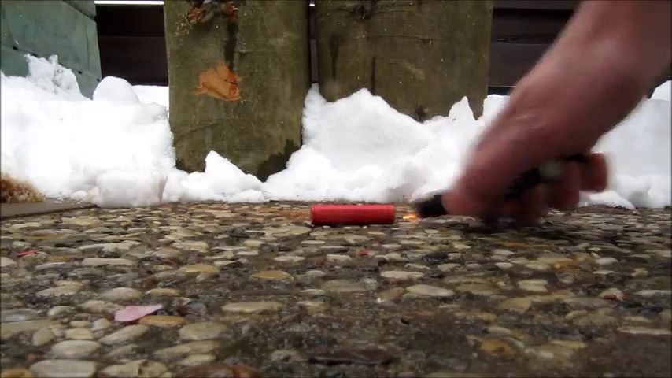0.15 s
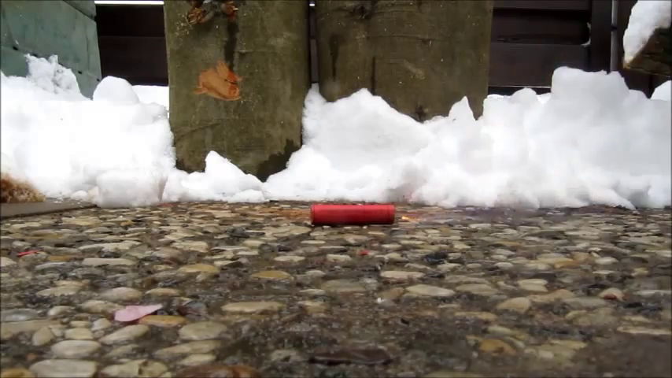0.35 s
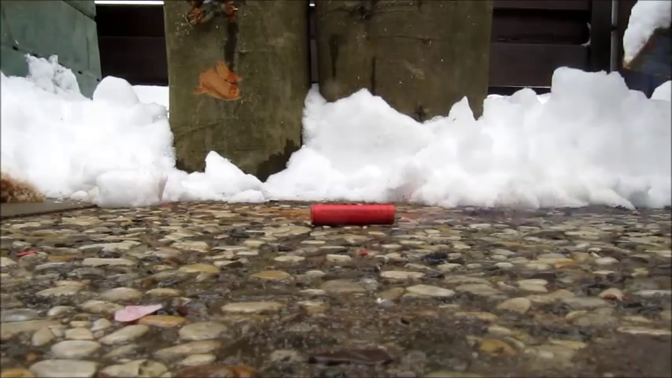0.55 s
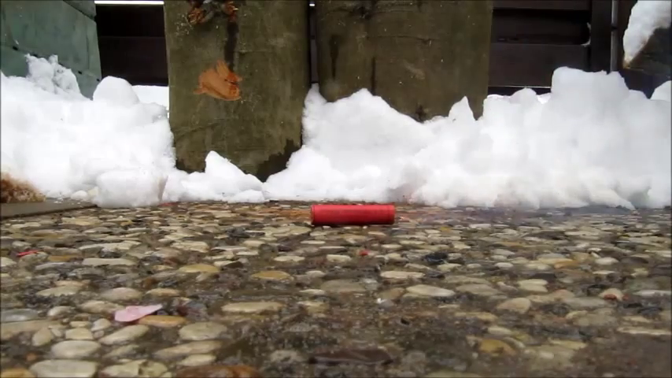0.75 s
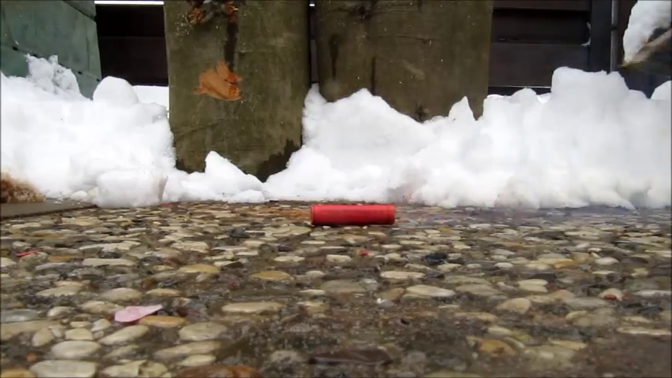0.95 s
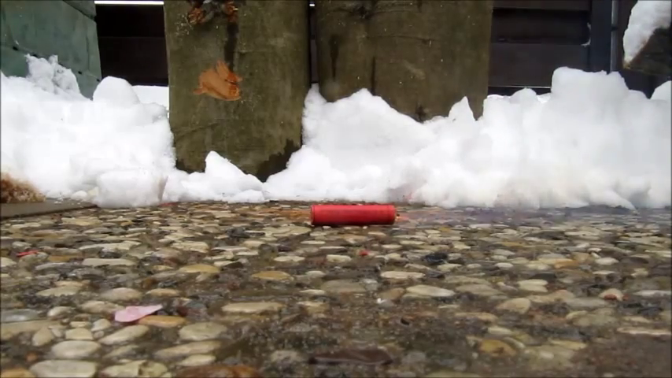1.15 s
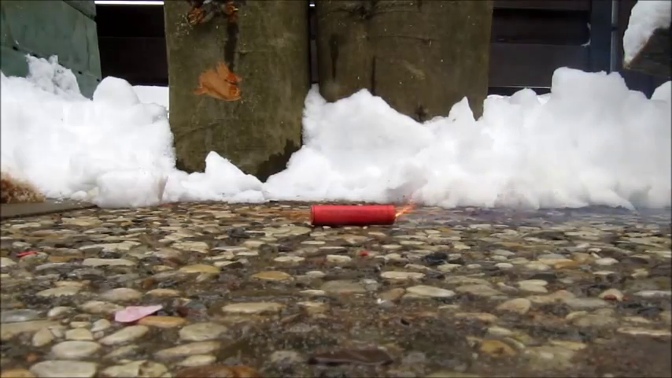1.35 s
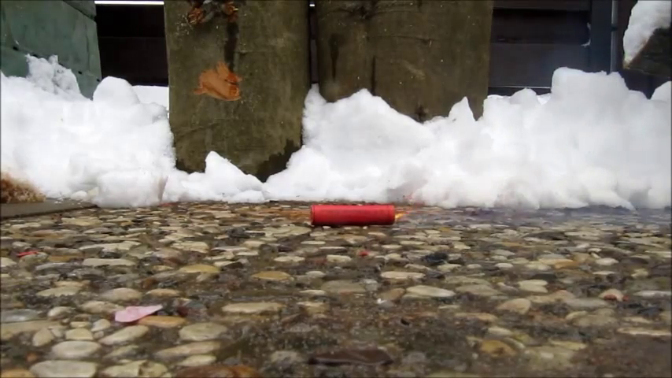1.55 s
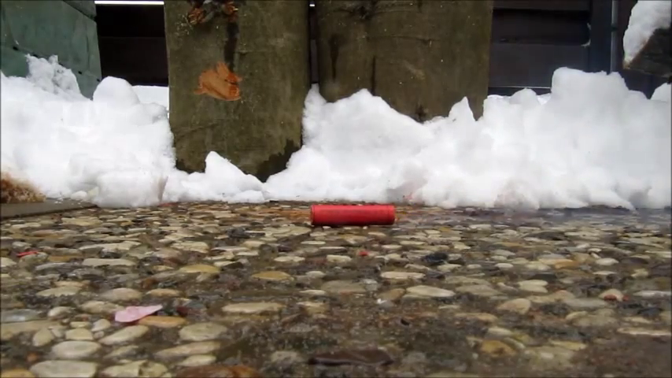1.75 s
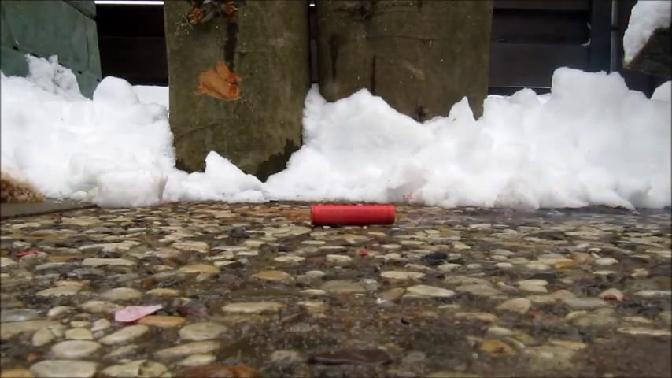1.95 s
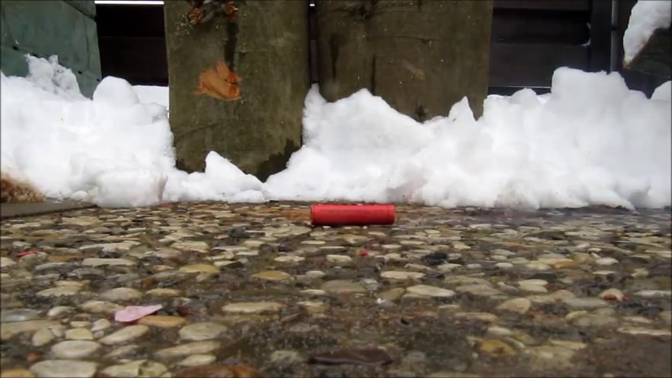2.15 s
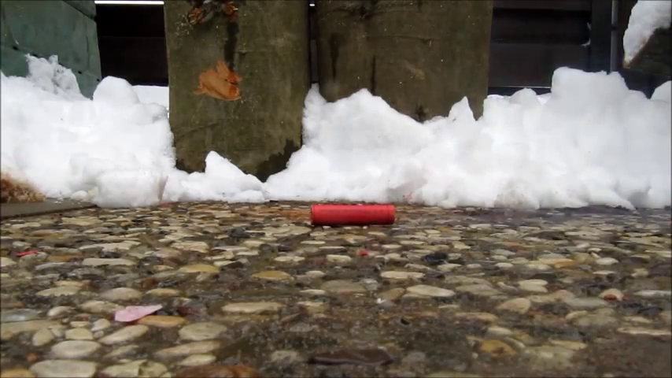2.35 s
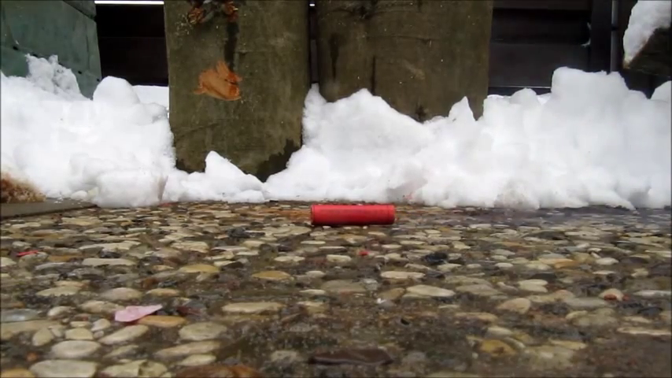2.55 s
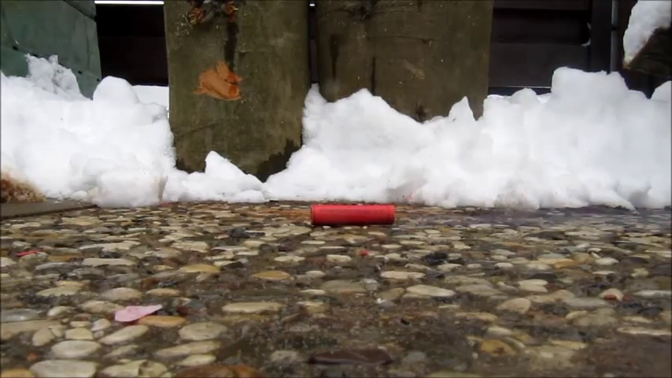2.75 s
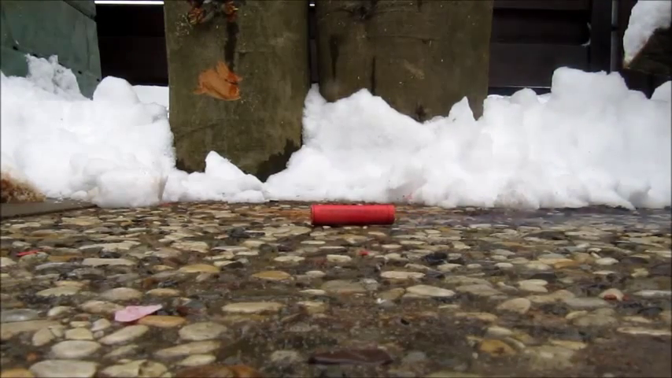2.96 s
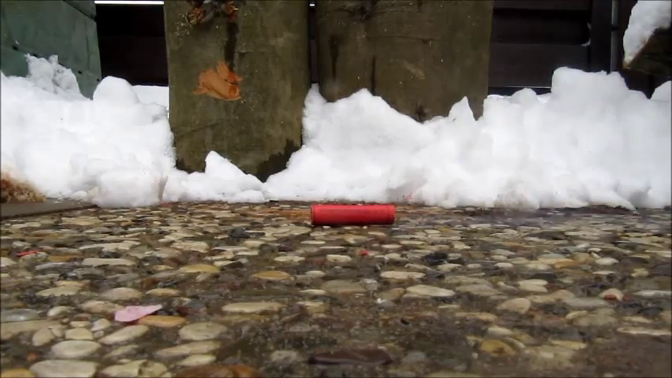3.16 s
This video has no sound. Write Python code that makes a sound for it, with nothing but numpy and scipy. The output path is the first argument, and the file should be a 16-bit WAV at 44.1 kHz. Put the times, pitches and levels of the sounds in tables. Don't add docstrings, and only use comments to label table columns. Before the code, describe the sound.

Burning firecracker fuse on a pebble slab, recorded close outdoors; a gas lighter hisses and snaps off, the fuse fizzes louder and thinner with low wind-like buffeting, then collapses to weak sputtering, with no bang.

```python
import sys
import numpy as np
from scipy import signal
from scipy.io import wavfile
from scipy.ndimage import uniform_filter1d

SR = 44100
rng = np.random.default_rng(int(sys.argv[2]) if len(sys.argv) > 2 else 0)


def unload_wav(signal):
    wavfile.write(
        sys.argv[1],
        SR,
        np.round(np.clip(np.atleast_2d(signal).T, -1, 1) * 32767).astype(np.int16),
    )


def ratio(d):
    e = np.asarray(d, float) / 20
    return 10 ** e


N = 143325

# pitch_hz, width_hz, level_db
SLAB = [
    (716, 98, -7.5),
    (1144, 68, -4.5),
    (547, 176, 2.5),
    (10100, 1300, 2),
]


def evened(x):
    return x / np.sqrt(np.mean(x ** 2) + 1e-20)


def smoothed(x, size, axis=-1):
    return uniform_filter1d(uniform_filter1d(x, size, axis=axis), size, axis=axis)


def swell(t, centre_s, length_s, edge=4):
    return np.exp(-np.abs(2 * (t - centre_s) / length_s) ** edge)


def colour(x, points, bumps=()):
    hz = np.abs(np.fft.fftfreq(8192, 1 / SR))
    point_hz, point_db = np.transpose(points)
    db = np.interp(np.log(hz + 1), np.log(point_hz + 1), point_db)
    for centre_hz, width_hz, bump_db in bumps:
        db = db + bump_db * np.exp(-((hz - centre_hz) / width_hz) ** 2)
    log_gain = np.log(ratio(np.maximum(db, -100)))
    taps = np.fft.ifft(np.exp(np.conj(signal.hilbert(log_gain)))).real[:4096]
    return evened(signal.oaconvolve(x, taps)[:N])


def wander(span_s):
    return evened(smoothed(rng.standard_normal(N), max(int(span_s * SR), 1)))


def steadied(x, span_s=0.044):
    return x / np.sqrt(uniform_filter1d(x ** 2, int(span_s * SR)) + 0.042)


def add(mix, start_s, sound):
    part = mix[round(start_s * SR):][:len(sound)]
    part += sound[:len(part)]


def lighter():
    # pitch_hz, level_db per Hz
    torch = [(150, -62), (250, -21.5), (551, -8), (738, -9), (877, -9), (2680, -5), (9080, -10),
             (10800, -0.5), (15200, -30)]
    # pitch_hz, width_hz, level_db
    nozzle = [(2830, 430, 1.5), (6900, 650, 5), (10500, 900, -1.5), (5600, 550, -7)]
    shut_s, rise_s, close_s = .2152, 0.094, 0.059
    t = np.arange(N) / SR
    rise_db = -8.5 * np.clip(1 - t / rise_s, 0, 1)
    close_db = -60 * np.clip((t - shut_s) / close_s, 0, 2)
    level_db = -39 + rise_db + close_db + 1.0 * wander(0.0078)
    out = colour(rng.standard_normal(N), torch, nozzle + SLAB) * ratio(level_db)
    valve_snap(out, shut_s)
    return out


def valve_snap(mix, shut_s):
    # pitch_hz, level_db, t60_s
    modes = [(1760, -8, 0.0048), (2760, -15, .004), (4330, -10, 0.0049), (5850, -4.5, 0.0059),
             (7200, -10, 0.0054), (8650, -2.5, 0.011), (10000, 0, 0.0055), (11800, -6, .003),
             (12700, -8, .003), (14100, -5, .0025)]
    # delay_s, level_db, struck_hz, breadth_hz
    hits = [
        (-.0002, -11.5, 7500, 8000),
        (.0002, -14, 9800, 2500),
        (.0128, -46, 5000, 6000),
    ]
    u = np.arange(0, .02, 1 / SR)
    attack = np.minimum(u / 0.000214, 1) ** 2
    for delay_s, hit_db, struck_hz, breadth_hz in hits:
        ring = 0
        for k, (hz, db, t60_s) in enumerate(modes):
            excited = np.exp(-((hz - struck_hz) / breadth_hz) ** 2)
            sign = (-1) ** k
            tone = np.sin(2 * np.pi * hz * u + rng.random())
            ring = ring + sign * excited * ratio(db - 60 * u / t60_s) * tone
        add(mix, shut_s + delay_s, ratio(hit_db) * ring * attack)


def buffet():
    # start_s, level_db
    air = [
        (0, -62.5),
        (.55, -66.5),
        (.7, -60.5),
        (1.35, -52.5),
        (1.5, -49.5),
        (2.0, -48.5),
        (2.65, -49),
        (2.85, -58.5),
        (3.25, -63),
    ]
    # centre_s, length_s, level_db
    gusts = [(1.457, 0.032, -48), (1.498, 0.027, -47), (1.58, 0.049, -48.5), (1.774, 0.073, -50.5),
             (1.847, 0.045, -41), (1.916, 0.082, -40.5), (2.03, 0.17, -42.5), (2.113, 0.028, -45),
             (2.238, 0.13, -45.5), (2.336, .05, -45.5), (2.419, 0.044, -42.5), (2.48, 0.028, -45.5),
             (2.559, 0.025, -45), (2.744, 0.09, -45.5), (2.965, 0.066, -54), (3.068, .02, -57)]
    # pitch_hz, level_db per Hz
    lull = [(15, -4.5), (40, 0), (90, -10), (200, -14.5), (400, -31), (800, -94)]
    breeze = [(20, -29), (60, 1), (130, -4.5), (250, -24), (450, -18), (900, -79)]
    rumble = [(20, -4), (45, -9), (90, -1.5), (220, -4), (450, -15.5), (850, -26), (1300, -58),
              (2500, -100)]
    weak_db, strong_db = -55, -36
    t = np.arange(N) / SR
    level = 1e-6 + sum(ratio(db) * swell(t, at, length_s) for at, length_s, db in gusts)
    strength = np.clip((20 * np.log10(level) - weak_db) / (strong_db - weak_db), 0, 1)
    gust_noise, air_noise = rng.standard_normal((2, N))
    gust = (1 - strength) * colour(gust_noise, breeze) + strength * colour(gust_noise, rumble)
    out = steadied(gust) * level * ratio(3.5 * wander(0.006))
    out = out + steadied(colour(air_noise, lull), 0.091) * ratio(np.interp(t, *np.transpose(air)))
    puffs(out)
    return out


def puffs(mix):
    # start_s (of the deepest push), peak_db, pitch_hz
    pushes = [(0.0577, -49, 47.7), (.312, -45.5, 46), (1.472, -43, 60), (1.5538, -32.5, 150),
              (1.5843, -34.5, 60), (1.5984, -26.5, 219), (1.7926, -32, 120), (1.834, -30, 170),
              (1.8509, -34, 250), (1.8616, -22.5, 178), (1.8608, -26.5, 496), (2.311, -34.5, 404),
              (1.7568, -38.5, 160), (1.8959, -22, 130), (1.9097, -23, 294), (1.9173, -31, 160),
              (1.941, -25.5, 199), (1.9593, -30, 141), (1.97, -33, 120), (1.999, -28, 135),
              (2.0093, -27.5, 89), (2.0334, -27, 130), (2.047, -34, 96), (2.067, -28, 127),
              (2.1016, -23.5, 125), (2.115, -31, 190), (2.1785, -37, 110), (2.2054, -33.5, 95),
              (2.2315, -37, 70), (2.2533, -28.5, 89), (2.317, -27.5, 120), (2.359, -35, 133),
              (2.4064, -29, 140), (2.426, -32, 112), (2.4933, -31, 70), (2.5507, -30, 110),
              (2.7138, -36, 86), (2.7339, -30.5, 126), (2.7451, -30, 121), (2.761, -31, 125),
              (3.085, -42, 60), (3.096, -44, 50)]
    decay_turns, snap = .8, .35
    lead_turns = .32
    for at, peak_db, hz in pushes:
        turns = np.arange(0, 3 * decay_turns, hz / SR)
        phase = 2 * np.pi * turns
        push = np.sin(phase) - snap * np.sin(2 * phase) + snap ** 2 * np.sin(3 * phase)
        envelope = np.exp(-turns / decay_turns * 1.55) * np.minimum(turns / 0.14, 1)
        add(mix, at - lead_turns / hz, -ratio(peak_db + 2) * push * envelope)


def patchy(x):
    z = signal.stft(x, nperseg=256)[2]
    field = uniform_filter1d(rng.standard_normal(z.shape), size=4, axis=0)
    field = uniform_filter1d(field, size=16, axis=1)
    patch_db = 0.5 * evened(field)
    return signal.istft(z * ratio(patch_db), nperseg=256)[1][:N]


def spitting():
    spits_per_s, spread_db, spit_share = 5000, 1.5, 0.56
    strength = ratio(spread_db * np.minimum(rng.exponential(1, N), 5))
    spits = strength * (rng.random(N) < spits_per_s / SR)
    gas = rng.standard_normal(N)
    return patchy(np.sqrt(spit_share) * evened(spits - spits.mean()) + np.sqrt(1 - spit_share) * gas)


def burning(t):
    # start_s, level_db, depth (0 bare fuse, 1 inside the tube)
    burn = [(0, -62, 0.2), (.2, -42.5, 0), (.25, -40.5, 0.02), (.48, -32.5, 0.05), (.7, -30, 0),
            (1.0, -28.5, 0.09), (1.25, -26, 0.08), (1.31, -23.5, 0.18), (1.322, -27, 0.36),
            (1.65, -23.5, 0.62), (1.849, -25, 0.76), (2.0, -26.5, 0.68), (2.25, -25, 0.83), (2.5, -26, 0.9),
            (2.9, -27, 0.86), (2.973, -25.5, 0.91), (2.994, -48.5, 0.66), (3.25, -55.5, 0.82)]
    # centre_s, length_s, change_db, depth_change
    pockets = [(0.402, 0.02, 2, 0.06), (0.773, 0.042, 1.5, -0.23), (0.506, 0.025, -3.5, -0.12),
               (0.563, 0.046, 0.5, 0.057), (0.615, .04, 1.5, 0.077), (.72, 0.018, -3.5, -0.091),
               (0.815, 0.067, 3, 0.13), (0.882, 0.057, -1, -0.037), (0.974, 0.013, 4, -0.21),
               (1.038, 0.016, -3.5, 0.1), (1.229, 0.052, 2.5, -0.037), (1.375, 0.051, -1.5, 0.052),
               (1.527, 0.064, -1, -0.024), (1.735, 0.031, -3, -0.096), (1.781, 0.049, 2, 0.086),
               (1.884, 0.035, -3, 0), (1.94, 0.084, -3, -0.031), (2.179, 0.079, 2.5, 0.02),
               (2.292, 0.047, 1, -0.05), (2.51, 0.068, -2, -0.01), (2.676, 0.047, -2, 0.017),
               (2.749, 0.039, -3, -0.023), (2.888, 0.076, -2, -0.019), (2.988, .018, -3, 0),
               (3.075, 0.042, -2.5, 0.18), (3.104, 0.018, 3, 0.1), (3.132, .018, 2.5, 0.05),
               (3.206, 0.022, 1, .1), (3.148, .014, -1, .1), (3.18, .014, -4, .1), (3.232, .016, -2, .2),
               (2.03, 0.22, 0, .1), (0.786, .008, -3.5, 0), (1.725, 0.012, -2.5, -0.069),
               (1.47, 0.13, 0.5, .1)]
    s, db, depth = np.transpose(burn)
    db, depth = np.interp(t, s, db), np.interp(t, s, depth)
    for at, length_s, change_db, deeper in pockets:
        shape = swell(t, at, length_s, edge=9)
        db, depth = db + change_db * shape, depth + deeper * shape
    return db, np.clip(depth, -.25, 1.15)


def swung(x, t):
    # centre_s, length_s, roar_db, top_db
    swings = [(0.32, 0.15, 3.5, -2), (0.58, .13, -4.5, -1.5), (0.7, .08, 2, -1.5), (0.916, .08, 3.5, -5),
              (1.058, 0.084, 7, 1), (1.26, 0.091, -2, 2), (1.374, 0.11, 3, 5), (1.473, 0.086, 2, -1.5),
              (1.692, 0.082, -1, 3), (1.923, 0.048, 0, 7.5), (2.3, 0.04, -0.5, 6), (2.42, .1, -0.5, 3),
              (2.642, 0.084, 2.5, 0), (2.98, .06, 1.5, 1), (3.15, .2, -3, 1)]
    lip_s, lip_db = 0.88, -1
    deep_s, deep_db_per_s = 2.42, -14
    top_filter = signal.butter(N=2, Wn=11800, btype="high", fs=SR, output="sos")
    roar_filter = signal.butter(N=2, Wn=1350, fs=SR, output="sos")
    top = signal.sosfiltfilt(top_filter, x)
    roar = signal.sosfiltfilt(roar_filter, x)
    roar_db = 0
    top_db = lip_db * (t > lip_s) + deep_db_per_s * np.maximum(t - deep_s, 0)
    for at, length_s, low_db, high_db in swings:
        shape = swell(t, at, length_s)
        roar_db, top_db = roar_db + low_db * shape, top_db + high_db * shape
    return x + roar * (ratio(roar_db) - 1) + top * (ratio(top_db) - 1)


def fuse():
    # pitch_hz, level_db per Hz
    bare = [(150, -39), (250, -23), (500, -16), (1020, -12.5), (1130, -11.5), (1320, -10.5), (5270, -6),
            (9020, 0), (15700, -28)]
    lip = [(290, -35), (500, -18), (687, -17.5), (865, -17), (3360, -12.5), (8090, -6.5), (9080, -1),
           (11400, -6.5), (15700, -35)]
    tube = [(530, -46), (900, -27.5), (1120, -27.5), (3120, -17.5), (3320, -20), (8030, -3), (9060, -0.5),
            (11400, -6), (15700, -37.5)]
    t = np.arange(N) / SR
    db, depth = burning(t)
    drive = spitting()
    outside, inside = np.maximum(1 - 2 * depth, 0), np.maximum(2 * depth - 1, 0)
    out = outside * colour(drive, bare, SLAB)
    out = out + (1 - outside - inside) * colour(drive, lip, SLAB)
    out = out + inside * colour(drive, tube, SLAB)
    out = swung(out, t) * ratio(db + 0.97 * wander(0.0087))
    loud_spits(out)
    return out


def loud_spits(mix):
    # start_s, peak_db, pitch_hz, length_s
    pops = [(0.7637, -12, 9700, .0008), (0.785, -6, 3750, 0.00058), (0.8018, -13, 8450, 0.0014),
            (.8465, -10.5, 7000, 0.0013), (1.728, -12, 8500, 0.0015), (3.0695, -40, 9950, .003),
            (3.108, -45, 7000, 0.0046), (3.159, -36, 9800, .003), (3.1617, -35, 9100, 0.0037),
            (3.1868, -35, 9500, 0.0005), (3.127, -43, 6500, .002), (3.212, -44, 10500, .002),
            (3.0625, -51.5, 850, 0.0046)]
    for at, peak_db, hz, length_s in pops:
        u = np.arange(0, 3 * length_s, 1 / SR)
        grit = 1 + 1.2 * smoothed(rng.standard_normal(1000), 9)[:len(u)]
        envelope = np.exp(-2 * u / length_s) * np.minimum(u / 0.00021, 1) ** 2
        add(mix, at, ratio(peak_db) * envelope * grit * np.sin(2 * np.pi * hz * u))


def scene():
    # pitch_hz, level_db per Hz
    yard = [(59, -29), (100, -3), (184, -10.5), (472, -1), (2860, -16), (10100, -8.5), (15000, -23)]
    # delay_s, level_db
    echoes = [
        (.0023, -25),
        (.0041, -37),
        (.0078, -23),
        (0.0124, -19.5),
        (.019, -19),
    ]
    near = fuse()
    out = lighter() + buffet() + near + ratio(-63.5) * colour(rng.standard_normal(N), yard)
    for delay_s, db in echoes:
        add(out, delay_s, ratio(db) * near[:N - round(delay_s * SR)])
    return out[None]


def low_pass(x):
    return signal.sosfilt(signal.butter(12, 15750, fs=SR, output="sos"), x)


def record(dry):
    edge = signal.firwin(401, 15750, window=("kaiser", 9), fs=SR)
    mix = signal.oaconvolve(dry, edge[None], "same")
    return low_pass(mix)


dry = scene()
out = record(dry)
unload_wav(out)
```